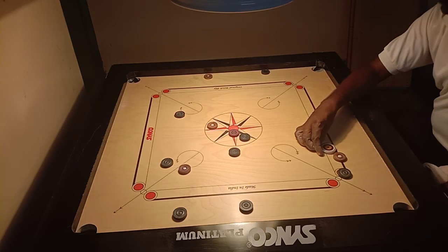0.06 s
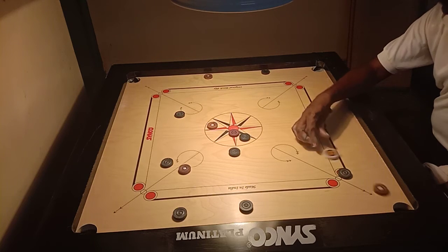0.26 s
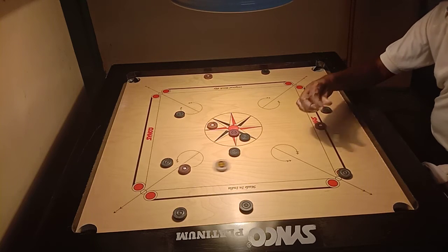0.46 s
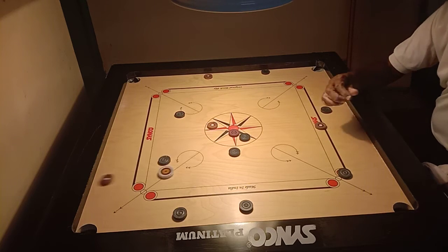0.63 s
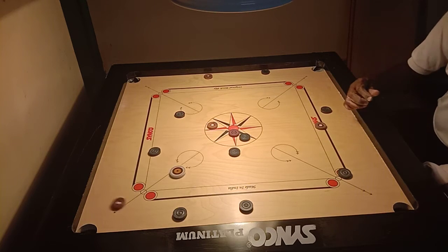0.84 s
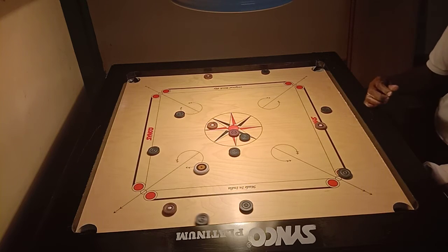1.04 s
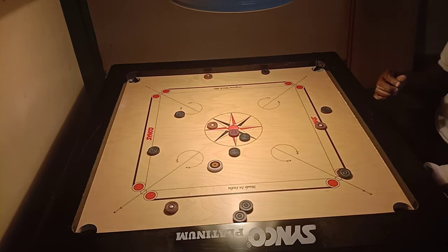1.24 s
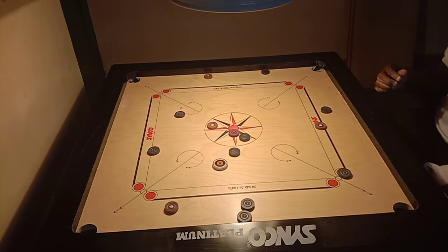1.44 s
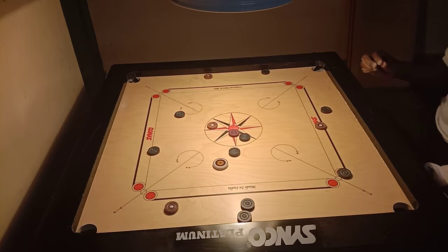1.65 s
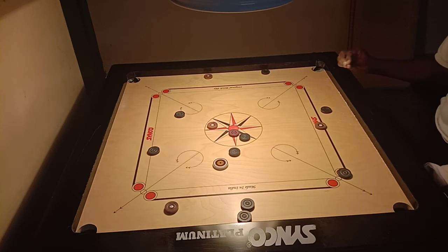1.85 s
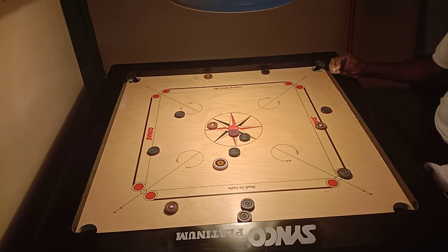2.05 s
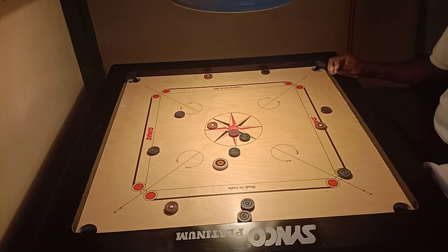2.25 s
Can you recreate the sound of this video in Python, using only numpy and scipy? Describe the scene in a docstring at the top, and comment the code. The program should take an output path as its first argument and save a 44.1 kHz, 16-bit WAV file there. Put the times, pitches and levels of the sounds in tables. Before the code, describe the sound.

A carrom striker is flicked across a wooden board at about 0.2 seconds and clacks sharply into a disc. Quick, uneven knocks follow as discs collide and rebound off the rim, loudest between 0.5 and 1 second, each ringing briefly in a small, bare room. Two faint taps come by 1.3 seconds. The ring fades, leaving a low room rumble and a few very faint, brief tones until about 2.3 seconds.

```python
"""A low rumble fills a small, bare, echoing room; the sound is all but mono.
At 0.18 s a carrom striker is flicked across a wooden board. Until 1.3 s it knocks the discs and they
rebound off the frame: each contact is a very short click, then the board's resonances and the clack
ring on in the room. The ring dies away, leaving the rumble and a few faint, brief tones."""
import sys
import numpy as np
from scipy import signal
from scipy.fft import rfft, irfft
from scipy.io import wavfile
from scipy.ndimage import uniform_filter1d

SR = 44100
rng = np.random.default_rng(int(sys.argv[2]) if len(sys.argv) > 2 else 0)


def file_out(sig):
    """Save sig as 16-bit WAV at sys.argv[1]."""
    # one column per channel
    cols = np.atleast_2d(sig).T
    # limit, then scale
    lim = np.clip(cols, -1, 1)
    pcm = np.round(lim * 32767).astype(np.int16)
    wavfile.write(sys.argv[1], SR, pcm)


N = 105840
T = np.arange(N) / SR
HZ = np.maximum(np.fft.rfftfreq(N, 1 / SR), 1)


def from_db(db):
    """Decibels to gain."""
    return 10 ** (np.asarray(db) / 20)


def across(hz, values):
    """Values joined by straight lines on a log-frequency axis."""
    return np.interp(np.log(HZ), np.log(hz), values)


def resonance(hz, width_hz):
    """Bell-shaped spectral peak, height 1."""
    return 1 / (1 + (2 * (HZ - hz) / width_hz) ** 2)


def noise_spectrum(db_per_hz):
    """Spectrum of a noise with the given density."""
    return rfft(rng.standard_normal(N)) * np.sqrt(SR / 2) * from_db(db_per_hz)


def add(out, sound, start_s):
    """Mix a sound in at start_s."""
    start = round(start_s * SR)
    out[start:] += sound[:N - start]


# Each row: frequency in Hz, level in dB per Hz.
RUMBLE_SPECTRUM = [(20, -110), (40, -99), (60, -81.5), (105, -77.5), (165, -78.5), (240, -95.5),
                   (420, -92.5), (850, -100), (1100, -100), (1245, -91), (1400, -100), (2400, -100),
                   (4200, -110), (5600, -108), (8000, -119), (15000, -118)]
# Each row: time in seconds, bass gain in dB.
BASS_SWELL = [(0, -1.5), (.3, 4), (.55, 1), (.75, -0.5), (1.2, 0.5), (1.72, -1.5), (1.87, 1), (2.05, -3),
              (2.4, -2.5)]

def rumble(bass_hz=220):
    """Room rumble: the bass swells and sinks under a faint, steady hiss."""
    noise = noise_spectrum(across(*np.transpose(RUMBLE_SPECTRUM)))
    swell = from_db(np.interp(T, *np.transpose(BASS_SWELL)))
    bass = irfft(noise * (HZ < bass_hz), N)
    hiss = irfft(noise * (HZ >= bass_hz), N)
    return swell * bass + hiss


# Each row: start in seconds, length in seconds, pitch in Hz, level in dB.
FAR_TONES = [(0.1, 0.069, 784, -60.5), (1.5, .17, 5700, -81), (1.61, .09, 3000, -74.5),
             (1.7, .08, 2330, -72.5), (1.76, .06, 1667, -64.5), (1.85, 0.25, 687.5, -64),
             (2.13, .14, 5700, -82.5)]

def far_tones(width_hz=22):
    """Faint, wavering tones: narrow bands of noise swell and fade."""
    out = np.zeros(N)
    for start_s, length_s, hz, db in FAR_TONES:
        tone = irfft(noise_spectrum(0) * resonance(hz, width_hz), N)
        progress = np.clip((T - start_s) / length_s, 0, 1)
        envelope = np.sqrt(np.abs(np.sin(np.pi * progress)))
        out += from_db(db) * envelope * tone / tone.std()
    return out


def click(hz, spread=1.5, soften_hz=8000):
    """A hard contact: one pulse of about a cycle and a half, height 1."""
    band = signal.butter(2, [hz / spread, hz * spread], "band", fs=SR, output="sos")
    pulse = np.zeros(N)
    pulse[:256] = signal.sosfilt(band, signal.unit_impulse(256))
    pulse = signal.sosfilt(signal.butter(4, soften_hz, fs=SR, output="sos"), pulse)
    return pulse / np.abs(pulse).max()


# Spectrum common to all clacks. Each row: frequency in Hz, relative level in dB.
CLACK_SPECTRUM = [(120, -23.5), (290, -29.5), (450, -22.5), (700, -18.5), (900, -9), (1080, -7.5),
                  (1450, -6.5), (2300, -4.5), (3300, -4), (4500, -9), (6000, -9), (7400, -10.5),
                  (8200, -23), (9600, -18), (11500, -30.5), (13500, -37), (15200, -27)]
# Each row: centre in Hz, width in Hz, lift in dB struck on the left, lift in dB struck on the right.
BOARD_RESONANCES = [(285.7, 170, -4.5, 8), (441, 35, 6, 5), (601, 60, 15, 7), (822, 34, 1.5, 7),
                    (1200, 98, 1.5, 15), (1282, 37, 12.5, 9.5), (1660, 90, 5.5, -5.5), (2035, 90, -1, 3.5),
                    (2300, 140, 1, 6.5), (2990, 100, -5, 1.5), (5340, 410, 2, 5.5)]

def clack_db(place):
    """Spectrum of a wooden clack, lifted by the board's broad resonances at the place struck."""
    lift = 0
    for hz, width_hz, left_db, right_db in BOARD_RESONANCES:
        peak_power = from_db(left_db + place * (right_db - left_db)) ** 2
        lift += max(peak_power - 1, 0) * resonance(hz, width_hz) ** 2
    return across(*np.transpose(CLACK_SPECTRUM)) + 10 * np.log10(1 + lift)


# Each row: band centre in Hz, time to fall 60 dB in seconds.
ROOM_DECAY = [(200, .9), (600, 0.59), (900, 0.74), (1250, 0.53), (1700, 0.7), (2500, 0.67), (4500, 0.54),
              (7500, 0.46), (11000, .55), (15000, .48)]

def room_ring(spectrum_db, hold_s=0.026, early_db=-8.5, early_s=0.012):
    """Dense reflections of one blow: strong at first, they hold briefly, then die band by band."""
    centres_hz, t60s_s = np.transpose(ROOM_DECAY)
    wash = noise_spectrum(spectrum_db)
    age_s = np.hypot(T, hold_s) - hold_s
    tail = np.zeros(N)
    for weights, t60_s in zip(np.eye(len(centres_hz)), t60s_s):
        band = irfft(wash * across(centres_hz, weights), N)
        tail += band * from_db(-60 * age_s / t60_s)
    return tail * (1 + from_db(early_db) * np.exp(-T / early_s))


# Each row: pitch in Hz, dB over the blow's level struck on the left, the same struck on the right.
BOARD_MODES = [(441, -3, 3), (814, 0, 11), (1151, 16, 28), (1228, 25, 21), (1255, 27, 25), (1304, 23, 16),
               (1764, 21, 14), (1910, 9, 23), (1947, 9, 26), (2114, 16, 20), (2235, 11, 21), (2945, 18, 11),
               (2980, 11, 20), (3011, 14, 21)]

def board_modes(place, blow_db, t60_s=0.6):
    """Clear notes within the ring: decaying sines whose strength varies from blow to blow."""
    t, out = T[:SR], np.zeros(SR)
    for hz, left_db, right_db in BOARD_MODES:
        phase = rng.random()
        db = left_db + place * (right_db - left_db) + rng.uniform(-2.5, -0.5)
        db += np.interp(hz, HZ, blow_db)
        out += from_db(db) * np.sin(2 * np.pi * (hz * t + phase))
    return np.pad(out * from_db(-60 * t / t60_s), (0, N - SR))


# Centres in Hz of the thump, board, reference, bite, treble and air bands.
COLOUR_BANDS_HZ = [550, 1200, 2300, 4200, 7200, 12000]
# Each row: start in seconds, click level in dB, click pitch in Hz, ring level in dB, ring build-up in
# seconds, place on the board (0 left, 1 right), then thump, board, bite, treble and air gains in dB.
# The first row is the flick.
CONTACTS = [ (0.1781, -19.5, 3240, -69, .0004, 0.13, -3, -9, 3.5, 0, -5),
            (0.2345, -12.5, 3015, -51.5, .0005, 0.94, 3, 4, 0.5, -7.5, -5.5),
            (0.3440, -29, 2200, -56.5, 0.0016, 0.54, 2.5, 1, -9, -11, -13),
            (0.3870, -30.5, 2486, -60.5, .002, 0.82, -0.5, -2.5, -3, -14, -7),
            (0.4898, -20.5, 4467, -77, 0.0037, .8, 4, -4.5, 9.5, 21.5, 24.5),
            (0.5490, -2.5, 4200, -70, 0.004, 0.098, -11, -4, 12.5, 10.5, 6),
            (0.66, -12.5, 6580, -55.5, .0004, 0.31, -3.5, 6, -0.5, 5, 1.5),
            (0.7272, -0.5, 4400, -61, .012, 0, -13.5, -0.5, 7, 6.5, -0.5),
            (0.811, -6.5, 4200, -55, 0.00034, 0, -8, 1.5, -7.5, 3.5, -5),
            (1.0020, -8, 3600, -62, 0.00064, 0.26, 4.5, -2.5, -0.5, -5.5, -6),
            (1.1407, -38.5, 2636, -74, 0.00059, 0.71, -4, 4, 0, -4.5, -10),
            (1.2931, -27, 3410, -78.5, 0.00055, 0.66, -6, -6.5, 0, -8.5, -35), ]

def discs(echo_count=8, echo_spread_s=0.017, echo_over_ring_db=34, low_cut_hz=300):
    """Each contact gives a direct click, the board's ring in the room and a few near echoes."""
    out = np.zeros(N)
    for start_s, click_db, click_hz, ring_db, build_s, place, thump, board, *highs in CONTACTS:
        pulse = click(click_hz)
        add(out, from_db(click_db) * pulse, start_s)
        blow_db = ring_db + across(COLOUR_BANDS_HZ, [thump, board, 0, *highs])
        ring = room_ring(clack_db(place) + blow_db) + board_modes(place, blow_db)
        add(out, ring * (1 - np.exp(-T / build_s)), start_s)
        for _ in range(echo_count):
            delay_s = rng.uniform(0, echo_spread_s)
            gain = from_db(ring_db + echo_over_ring_db) * rng.uniform(-1, 1)
            add(out, gain * pulse, start_s + delay_s)
    # A low cut keeps each sudden onset free of low thump.
    return signal.sosfilt(signal.butter(3, low_cut_hz, "high", fs=SR, output="sos"), out)


# Each row: start in seconds, level in dB.
CONTACT_SNAPS = [(0.2338, -37.5), (0.6602, -16), (1.002, -47.5)]

def snaps(low_cut_hz=14000, decay_s=0.00077):
    """A millisecond of very high fizz at the instant of a hard contact."""
    out = np.zeros(N)
    highpass = signal.butter(2, low_cut_hz, "high", fs=SR, output="sos")
    for start_s, db in CONTACT_SNAPS:
        fizz = signal.sosfilt(highpass, rng.standard_normal(N))
        add(out, from_db(db) * fizz / fizz.std() * np.exp(-T / decay_s), start_s)
    return out


def scene():
    """Board and room in the middle, with a trace of width in the rumble."""
    mid = discs() + snaps() + far_tones() + rumble()
    side = from_db(-24) * rumble()
    return np.array([mid + side, mid - side])


# Band edges of the noise suppressor in Hz.
SUPPRESSOR_EDGES_HZ = [1400, 3000, 5000, 7700, 11000, 22000]

def record(dry):
    """A mild noise suppressor turns each treble band down near its floor; the top is cut steeply."""
    depth_db, knee_db, knee_width_db, cutoff_hz = 5.5, 16.5, 3, 15600
    out, spectrum = dry, rfft(dry)
    for low_hz, high_hz in zip(SUPPRESSOR_EDGES_HZ, SUPPRESSOR_EDGES_HZ[1:]):
        band = irfft(spectrum * ((HZ >= low_hz) & (HZ < high_hz)), N)
        power = uniform_filter1d(band[0] ** 2, size=900)
        level_db = 10 * np.log10(np.abs(power) + 1e-14)
        over_floor_db = level_db - np.percentile(level_db, 10)
        closed = 0.5 - 0.5 * np.tanh((over_floor_db - knee_db) / (2 * knee_width_db))
        out = out + band * (from_db(-depth_db * closed) - 1)
    return signal.sosfilt(signal.ellip(10, 0.1, 80, cutoff_hz, fs=SR, output="sos"), out)


dry = scene()
out = record(dry)
file_out(out)
```